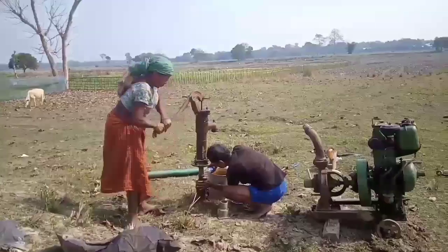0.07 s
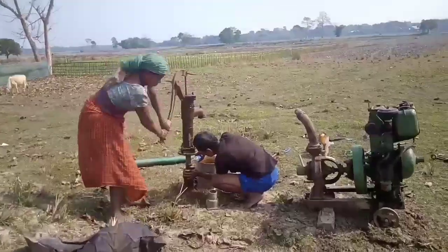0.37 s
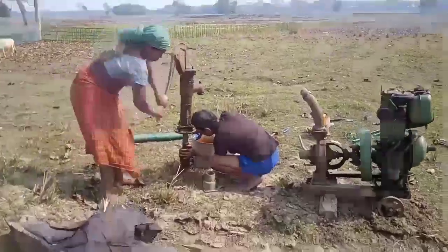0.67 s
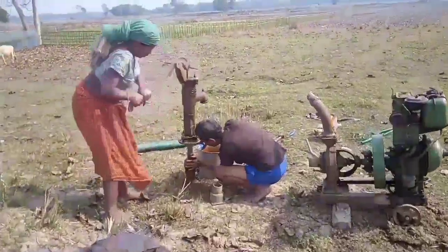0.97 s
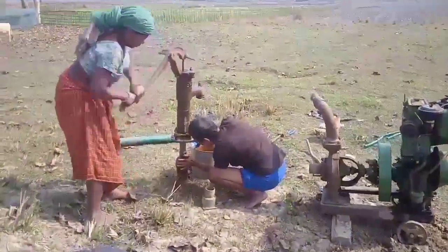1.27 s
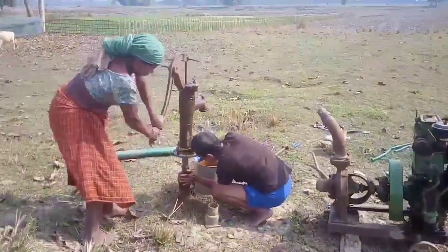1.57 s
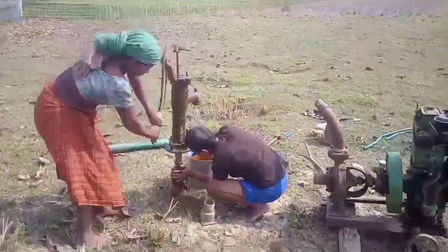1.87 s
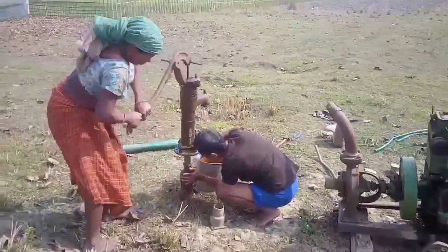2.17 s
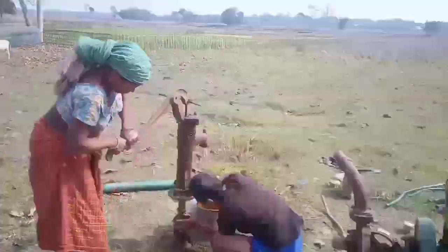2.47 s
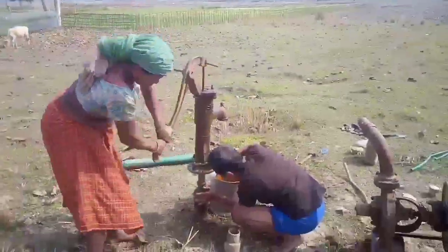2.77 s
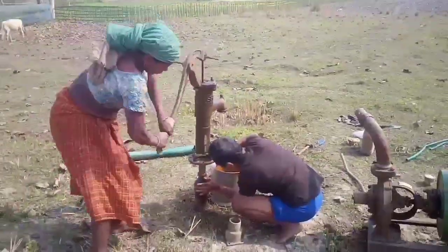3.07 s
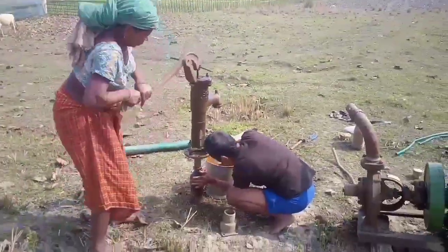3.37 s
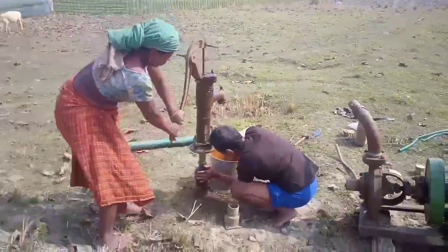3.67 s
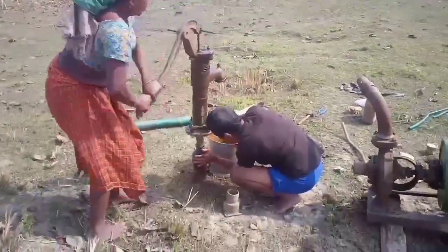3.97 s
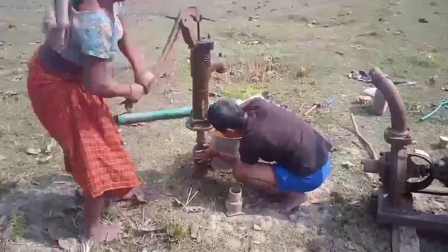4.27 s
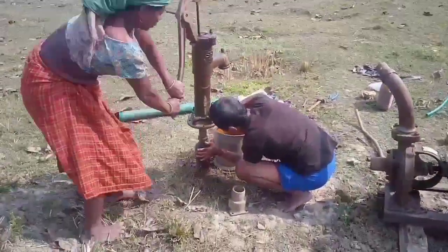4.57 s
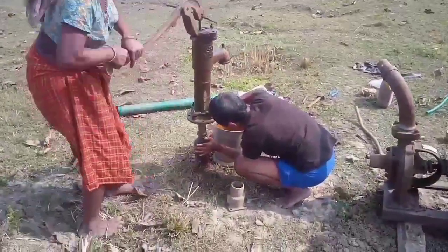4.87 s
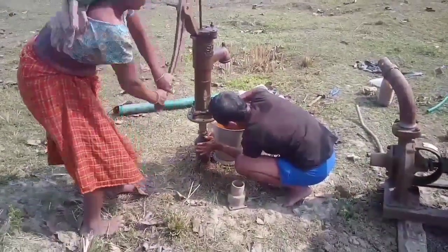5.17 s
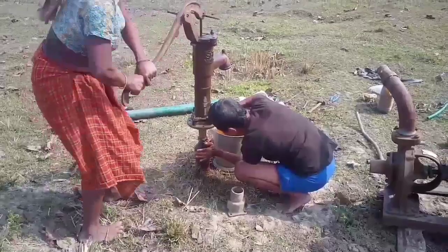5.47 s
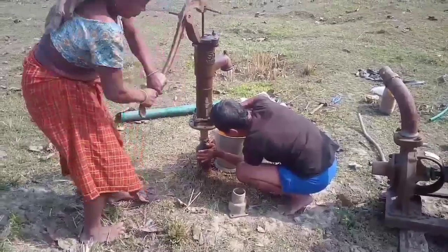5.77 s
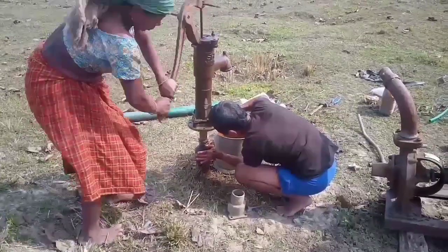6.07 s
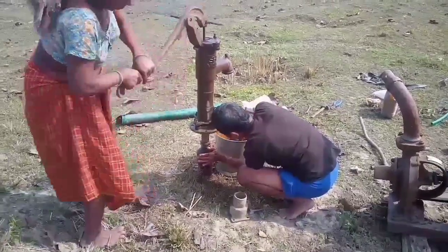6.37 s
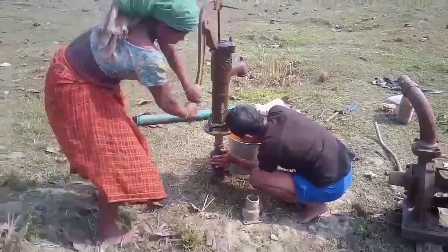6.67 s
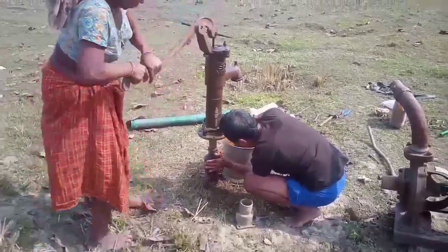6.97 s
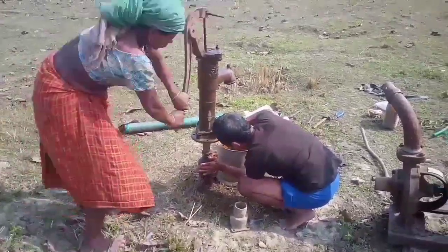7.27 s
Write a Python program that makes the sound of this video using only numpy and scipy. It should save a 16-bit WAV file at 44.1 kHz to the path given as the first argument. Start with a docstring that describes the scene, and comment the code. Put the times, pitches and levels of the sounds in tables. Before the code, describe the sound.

A cast-iron hand pump is worked in an open field for about seven and a half seconds, at roughly two strokes a second. Each stroke begins with a short raspy gulp from the valve, then the dry pivot scrapes and loose pins strike the iron. The piston stops with a clack, and the air in the barrel rings briefly with a hollow gliding note. Faint squeaks come between 1.5 and 2.7 seconds and again near 4.5. From about 3 seconds the clacks are louder, and the strokes gradually slow a little. Wind buffets the microphone throughout with an uneven low rumble, over a thin, patchy high hiss. Soft wind thumps land around 3 and 3.9 seconds. Stronger gusts arrive near 6 seconds, followed by a run of thumps from 6.3, hardest just after 7 seconds, around the last stroke.

```python
"""Wind buffets the microphone in an open field, over a thin high hiss.
A cast-iron hand pump is worked at about two strokes a second. In each stroke the valve gulps, the dry
pivot scrapes and loose pins clack; the piston then stops with a clack and the air in the barrel rings
with a gliding note. A few faint squeaks are heard. Towards the end the strokes slow a little and
eddies thump the microphone harder."""
import sys
import numpy as np
from scipy import signal
from scipy.fft import rfft, irfft, next_fast_len
from scipy.io import wavfile
from scipy.ndimage import uniform_filter1d, map_coordinates

SR = 44100
rng = np.random.default_rng(int(sys.argv[2]) if len(sys.argv) > 2 else 0)


def bounce(signal):
    """Save signal as a 16-bit WAV file at the path given by the first command-line argument."""
    frames = np.transpose(np.atleast_2d(signal))
    limited = np.clip(frames, -1, 1)
    pcm = np.round(limited * 32767).astype(np.int16)
    wavfile.write(sys.argv[1], SR, pcm)


N = 327222
TOP_HZ = 15750


def amp(db):
    """Decibels to gain."""
    return 10 ** (np.asarray(db) / 20)


def unit(x):
    """Scale to rms 1."""
    return x / np.sqrt(np.mean(x ** 2) + 1e-20)


def along(points, hz):
    """Interpolate (freq_hz, value) points on a log axis."""
    freqs_hz, values = np.transpose(points)
    return np.interp(np.log(hz + 1), np.log(freqs_hz + 1), values)


def curves(rows):
    """Per-sample curve for each column after time_s."""
    time_s, *columns = np.transpose(rows)
    return [np.interp(np.arange(N) / SR, time_s, column) for column in columns]


def wobble(rate_hz, size):
    """Smooth random curve, rate_hz knots a second."""
    knots = rng.standard_normal(int(size * rate_hz / SR) + 4)
    return map_coordinates(knots, [np.arange(size) * rate_hz / SR])


def filtered(x, response):
    """Apply a complex frequency response."""
    size = next_fast_len(len(x) + 4096)
    return irfft(rfft(x, size) * response(np.fft.rfftfreq(size, 1 / SR)), size)[:len(x)]


def noise(spectrum, size):
    """Coloured noise, rms 1."""
    return unit(filtered(rng.standard_normal(size), lambda hz: amp(along(spectrum, hz))))


def add(track, start_s, sound):
    """Mix a sound into the track."""
    part = track[max(round(start_s * SR), 0):][:len(sound)]
    part += sound[:len(part)]


def ring(t, attack_s, t60_s):
    """Soft rise, exponential fall, peak 1."""
    shape = (1 - np.exp(-t / attack_s)) * amp(-60 * t / t60_s)
    return shape / shape.max()


def rasp(t, hz, rise_oct_per_s, rough):
    """Gliding tone, shaken in strength and phase by turbulence."""
    phase = 2 * np.pi * np.cumsum(hz * 2 ** (rise_oct_per_s * t)) / SR
    shake = wobble(195, len(t)) + 1j * wobble(196.3, len(t))
    return np.imag((1 + rough * shake) * np.exp(1j * phase)) / np.sqrt(1 + 2 * rough ** 2)


def resonate(force, modes):
    """Drive (pitch_hz, width_hz, gain_db) modes of alternating sign."""
    hz, width_hz, db = np.transpose(modes).astype(np.float32)[:, :, None]
    gain = amp(db) * (-1) ** np.arange(len(hz))[:, None]

    def response(f):
        f = np.maximum(f, 1).astype(np.float32)
        detune = (hz * hz / f - f) / width_hz
        in_phase = 1 / (1 + detune * detune)
        return (gain.T @ in_phase + 1j * (gain.T @ (in_phase * detune)))[0]
    return filtered(force, response)


def excite(force, modes, damping, scatter_db):
    """Drive modes at random strengths, widths times damping; rms 1."""
    varied = [(hz, width * damping, db + scatter_db * rng.standard_normal()) for hz, width, db in modes]
    return unit(resonate(force, varied))


def patchy(x, depth_db):
    """Slow random patches of gain over pitch and time; rms 1."""
    spectra = signal.stft(x, nperseg=512)[2]
    patches = uniform_filter1d(rng.standard_normal(spectra.shape), size=8, axis=0)
    patches = uniform_filter1d(patches, size=50, axis=1)
    return unit(signal.istft(spectra * amp(depth_db * unit(patches)), nperseg=512)[1][:N])


# Spectra of field hush, hiss and high fizz: freq_hz, density_db
FIELD_SPECTRUM = [(300, 2), (800, -1.5), (1250, 5.5), (2400, 2), (3100, 3), (4500, -10.5), (12000, -23)]
HISS_SPECTRUM = [(2500, -16), (4200, -4.5), (5200, 5.5), (6200, 5.5), (7300, 2), (8500, 1), (9800, -10),
                 (14000, -66)]
FIZZ_SPECTRUM = [(5590, -37), (9500, -11), (11000, -5.5), (13300, 3.5), (13900, 1.5), (15300, -3.5),
                 (16000, -18)]
# Hiss levels: time_s, hiss_db, fizz_db
HISS_LEVELS = [(0, -51.5, -56), (.28, -59, -61), (.38, -53, -46.5), (.7, -55.5, -58.5), (1.26, -57.5, -62),
               (1.56, -51.5, -60.5), (3.6, -57, -57), (4.25, -61, -61), (4.55, -45.5, -50),
               (4.78, -58, -56), (5.1, -50, -58.5), (5.8, -55.5, -59.5), (6.15, -52, -52.5),
               (7.2, -60, -59), (7.29, -48.5, -46), (7.33, -66, -71), (7.42, -50.5, -58)]


def hiss():
    """Steady field hush under two bands of patchy high hiss that swell and drop out."""
    hiss_db, fizz_db = curves(HISS_LEVELS)
    high_hiss = amp(hiss_db) * patchy(noise(HISS_SPECTRUM, N), depth_db=2.1)
    high_hiss += amp(fizz_db) * patchy(noise(FIZZ_SPECTRUM, N), depth_db=2.1)
    hush = amp(-64) * noise(FIELD_SPECTRUM, N)
    return hush + amp(1.25 * wobble(16, N)) * high_hiss


# Buffet spectrum: freq_hz, density_db
BUFFET_SPECTRUM = [(30, -50), (50, -47), (80, -11), (130, 0.5), (200, 4), (330, -3.5), (480, -11.5),
                   (800, -28.5), (1300, -41), (2500, -64), (5000, -88)]
# Gusts: time_s, level_db
GUSTS = [(0.0, -37.5), (0.76, -42.5), (0.88, -52), (1.16, -42), (1.26, -48), (1.44, -40.5), (2.44, -48),
         (2.88, -40.5), (3.04, -45.5), (3.62, -33.5), (3.7, -38), (4.54, -41), (5.26, -56.5), (5.32, -52),
         (5.72, -48.5), (5.92, -34.5), (6.14, -46), (6.34, -31), (6.44, -37.5), (6.88, -50), (7.02, -39),
         (7.42, -46)]


def wind():
    """Lumpy turbulence at the microphone port; stronger gusts reach higher in pitch."""
    gust_db, = curves(GUSTS)
    lumps_db = 3 * wobble(70, N) + 1.6 * wobble(16, N)
    rumble = noise(BUFFET_SPECTRUM, N)
    low = filtered(rumble, lambda hz: 1 / (1 + (hz / 330) ** 4))
    reach = amp(2.15 * np.clip(gust_db + lumps_db + 41.5, -20, 6))
    puffs = amp(lumps_db) * (low + reach * (rumble - low))
    local_rms = np.sqrt(np.abs(uniform_filter1d(puffs ** 2, size=7000)) + 1e-9)
    return amp(gust_db + 0.6) * puffs / local_rms


# Eddies hitting the port: time_s, level_db
EDDIES = [(1.156, -35.5), (2.963, -19.5), (3.491, -26), (3.874, -20), (4.537, -27), (6.333, -20.5),
          (6.526, -16.5), (6.635, -20.5), (6.735, -29.5), (6.979, -21), (7.067, -19), (7.081, -13),
          (7.181, -10), (7.276, -18)]


def eddy_slaps():
    """An eddy builds to one suction pulse, which the port rounds into a thump."""
    lead_s, t60_s = .011, .11
    spectrum = [(30, -57), (75, -7), (160, 2.5), (450, 6.5), (1000, -13.5), (2500, -34), (5000, -90)]
    out, t = np.zeros(N), np.arange(SR // 10) / SR - 2 * lead_s
    swell = np.where(t < 0, np.exp(-(t / lead_s) ** 2), amp(-60 * t / t60_s))
    for time_s, db in EDDIES:
        width_s = 0.00035 * np.exp(0.08 * rng.standard_normal())
        suction = -np.exp(-np.abs(t - .0025) / width_s)
        port = signal.butter(3, [150, 1100 * amp(.5 * (db + 18))], "band", fs=SR, output="sos")
        thump = signal.sosfilt(port, suction)
        eddy = amp(-10.5) * noise(spectrum, len(t)) * swell
        add(out, time_s + t[0], amp(db - 2.5) * (thump / np.abs(thump).max() + eddy))
    return out


# Short gliding tones: start_s, length_s, pitch_hz, rise_oct_per_s, level_db
GLIDES = [(1.459, 0.058, 1196, 2.5, -42.5), (1.536, 0.014, 7030, 1.3, -37), (1.851, 0.067, 1170, 3, -41.5),
          (1.899, 0.072, 1860, 1, -42.5), (2.262, 0.072, 1290, 2.92, -46.5), (2.656, .07, 1194, 2.5, -53),
          (4.536, 0.047, 4330, -1.5, -47), (4.546, 0.063, 2570, -0.5, -55)]


def gliding_tones():
    """The barrel's air note rising after a stroke, and a few faint higher squeaks."""
    out = np.zeros(N)
    for start_s, length_s, hz, rise, db in GLIDES:
        t = np.arange(int(length_s * SR)) / SR
        add(out, start_s, amp(db) * rasp(t, hz, rise, rough=0.9) * np.sin(np.pi * t / length_s))
    return out


# Hollow body modes: pitch_hz, width_hz, gain_db
HOLLOW_MODES = [(445, 69, 33.5), (740, 340, 14.5), (848, 91, -11), (1103, 190, 0), (1500, 880, -7.5),
                (2055, 300, -5), (2372, 250, -6), (3075, 300, -3.5), (3850, 160, -5.5)]


def hollow(force, damping, scatter_db):
    """The hollow body rings in its upper modes."""
    return excite(force, HOLLOW_MODES[2:], damping, scatter_db)


# Casting and lever modes: pitch_hz, width_hz, gain_db
IRON_MODES = [(1500, 54, -15), (1990, 62, -14), (2350, 77, -13), (3030, 52, -9), (3830, 120, -12),
              (4720, 61, -16), (5240, 75, -12), (5890, 46, -13), (6320, 63, -4), (6870, 81, 0),
              (7970, 84, -8), (8530, 67, -10), (9120, 40, -11), (9530, 71, -11), (9820, 51, -11),
              (10800, 58, -8), (11600, 77, -19), (12200, 70, -8), (12800, 67, -6), (13700, 110, -13),
              (14300, 60, -11), (14900, 61, -6)]


def iron(force, damping, scatter_db):
    """The casting rings, its modes weighted anew by each contact."""
    return excite(force, IRON_MODES, damping, scatter_db)


# Bare contact noise: freq_hz, density_db
CONTACT_SPECTRUM = [(80, -27), (300, 26.5), (800, -3.5), (1500, -12.5), (4000, -1.5), (7000, 10.5),
                    (10000, -2.5), (14000, -4.5), (16000, -26)]


def linkage(force, width_hz, count):
    """Short-lived resonances of the loose joints, shifting with every contact."""
    pitches_hz = np.sort(rng.uniform(588, TOP_HZ, count))
    modes = [(hz, width_hz, along(CONTACT_SPECTRUM, hz)) for hz in pitches_hz]
    return excite(force, modes, damping=1, scatter_db=0.5)


# Lever strokes: start_s, stop_s, rub_db, gulp_db, clack_db, clack_body, low_mode_db, upper_mode_db
STROKES = [(0.182, 0.243, -47, -37, -28.5, -15, -58, -42), (0.513, 0.668, -50.5, -69, -25, -7, -62, -45.5),
           (0.912, 1.045, -51.5, -43, -25.5, -2, -48, -29.5),
           (1.301, 1.443, -48, -41, -21, -12.5, -37.5, -50),
           (1.69, 1.834, -53.5, -37.5, -23.5, -8, -32, -44),
           (2.076, 2.235, -47.5, -40.5, -27, 6, -42.5, -41), (2.472, 2.625, -52, -27, -29.5, -7, -34, -44),
           (2.878, 3.051, -49, -29, -17, -0.5, -33.5, -32.5),
           (3.34, 3.51, -50.5, -29.5, -13.5, 1, -40, -30),
           (3.823, 3.999, -47, -35.5, -18.5, -7, -40.5, -44),
           (4.323, 4.489, -45.5, -37, -14.5, -5.5, -24, -35.5),
           (4.814, 5.001, -56, -32.5, -13, -3.5, -29.5, -48), (5.3, 5.511, -46, -33, -16.5, 1.5, -27, -44),
           (5.851, 6.009, -42, -31.5, -18.5, -6, -34, -35),
           (6.36, 6.546, -46, -29.5, -18.5, -4, -29.5, -41), (6.93, 7.136, -43, -26.5, -19.5, -8, -26, -31)]


def valve():
    """Water passes the valve as each stroke starts: a raspy rising gulp and a scratchy knock."""
    out, t = np.zeros(N), np.arange(SR // 6) / SR
    for start_s, _, _, gulp_db, *_ in STROKES:
        tuning = 1 + 0.0274 * rng.standard_normal()
        envelope = ring(t, 0.0093, 0.053) + 0.14 * ring(t, 0.0031, 0.2)
        note = rasp(t, 586.3 * tuning, 4.9, rough=1.0) * envelope
        undertone = amp(-4.5) * rasp(t, 400 * tuning, 2.3, rough=0.2) * ring(t, 0.0037, 0.045)
        overtone = amp(-51.5) * rasp(t, 1620 * tuning, -0.88, rough=1.9) * ring(t, 0.0078, 0.047)
        scratch = hollow(rng.standard_normal(len(t)), damping=2.2, scatter_db=4)
        knock = amp(-53.5) * scratch * ring(t, 0.0013, 0.09)
        spit = amp(-40) * noise(CONTACT_SPECTRUM, len(t)) * ring(t, 0.0019, 0.0099)
        add(out, start_s, amp(gulp_db - 4) * (note + undertone) + overtone + knock + spit)
    return out


LOW_MODE_HZ, UPPER_MODE_HZ = 454, 1107  # air in the barrel


def air_sweep():
    """The piston shortens the air column: a breathy note climbs, less so as the pump primes."""
    primed_s = 3.7
    out = np.zeros(N)
    for start_s, stop_s, *_ in STROKES:
        length_s = stop_s - start_s
        t = np.arange(int(length_s * SR)) / SR
        rise_oct_per_s = 6.1 * max(1 - start_s / primed_s, 0)
        note = rasp(t, UPPER_MODE_HZ * 2 ** (-rise_oct_per_s * length_s), rise_oct_per_s, rough=2.2)
        add(out, start_s, amp(-54.5) * note * np.sin(np.pi * t / length_s))
    return out


def barrel():
    """The piston stops with a hollow knock; the air rings on, its modes drifting as the water moves."""
    delay_s = .005
    knock_modes = [(hz, width * 2.5, db) for hz, width, db in HOLLOW_MODES[1:]]
    out, t = np.zeros(N), np.arange(SR // 4) / SR
    for _, stop_s, *_, low_db, upper_db in STROKES:
        upper_hz = UPPER_MODE_HZ * (1 + 0.026 * rng.standard_normal())
        low = amp(low_db - 1) * rasp(t, LOW_MODE_HZ, -0.59, rough=0.13)
        low *= ring(t, 0.0041, 0.059) + 0.33 * ring(t, 0.019, 0.13)
        upper = amp(upper_db - 1.5) * rasp(t, upper_hz, 2.72, rough=0.66)
        upper *= ring(t, 0.0018, 0.097) + 0.14 * ring(t, 0.011, 0.069)
        knock = resonate(ring(t, 0.003, 0.046) * rng.standard_normal(len(t)), knock_modes)
        knock *= amp(max(upper_db - 6, low_db - 19)) / np.abs(knock).max()
        add(out, stop_s + delay_s, low + upper + knock)
    return out


def ticks(t, count=10, rate_hz=20, t60_s=.014):
    """Force envelope of small slips, uneven in time and strength."""
    times_s = np.cumsum(rng.uniform(0, 2, count)) / rate_hz
    age_s = t - times_s[:, None]
    decays = amp(-60 * np.abs(age_s) / t60_s) * (age_s > 0)
    return amp(16 + 3 * rng.standard_normal(count)) @ decays


def rubbing(pressure, t):
    """One dry contact sticks, slips and ticks; returns the iron's ring and the hollow body's."""
    grain = (amp(3.9 * wobble(81.3, len(t))) + ticks(t)) * amp(4.6 * wobble(700, len(t)))
    slips = pressure * grain * rng.standard_normal(len(t))
    joints = linkage(slips, width_hz=210, count=24)
    metal = iron(slips, damping=.6, scatter_db=5) + amp(-3) * joints
    body = unit(resonate(slips, HOLLOW_MODES)) + amp(-6) * hollow(slips, damping=.35, scatter_db=4)
    return np.array([metal, body])


def pivot_scrape():
    """Two dry contacts rub, easing as the lever slows, then softly on the swing back."""
    delay_s, overrun_s = .024, .004
    attack_s, release_s, return_t60_s, ease_db = .0098, .035, .18, 7
    out = np.zeros(N)
    for start_s, stop_s, db, *_ in STROKES:
        length_s = stop_s + overrun_s - start_s - delay_s
        t = np.arange(int((length_s + return_t60_s / 2) * SR)) / SR
        push = np.clip(np.minimum(t / attack_s, (length_s - t) / release_s), 0, 1)
        push *= amp(-ease_db * t / length_s)
        swing_back = amp(-11) * ring(np.maximum(t - length_s, 0), 0.0088, return_t60_s)
        metal, body = sum(rubbing(push + swing_back, t) for _ in range(2))
        scrape = amp(db + 1) * unit(metal) + amp(-50.5 + .5 * (db + 48)) * unit(body)
        add(out, start_s + delay_s, scrape * np.sqrt(length_s / t[-1]))
    return out


def clack(contact, body, top):
    """Contact chatter rings joints, casting and hollow body; body lifts the mids, top the treble."""
    chatter = contact * amp(2.6 * wobble(597, len(contact))) * rng.standard_normal(len(contact))
    grip = np.clip(2.5 + (body + 18) / 22, .25, 1)  # a glancing blow lets the lever ring on
    joints = amp(-0.5) * grip * linkage(chatter, width_hz=195, count=50)
    casting = iron(chatter, damping=0.75 * grip, scatter_db=4)
    cavity = amp(-8.5) * hollow(chatter, damping=0.61, scatter_db=2.5)
    body_db, top_db = 0.61 * (body + 5), 0.78 * (top + 14.5)
    colour = [(1000, body_db + 0.71), (2800, body_db - 1.5), (6500, 0), (12500, top_db)]
    blow = filtered(joints + casting + cavity, lambda hz: amp(along(colour, hz)))
    peak_rms = np.sqrt(uniform_filter1d(blow ** 2, size=128).max())
    return blow / peak_rms


# Loose pins striking the iron: time_s, level_db, body, top
PIN_STRIKES = [(0.2089, -21.5, -8, -8), (0.4615, -32, -14, -10), (0.6083, -22, 6, 0.5),
               (0.9555, -25, -28, -23), (0.9875, -30.5, 8, -6), (1.3335, -23, -9, -20),
               (1.393, -19.5, 3.5, -9), (1.722, -28, 6, -9), (1.8562, -22.5, -6.5, -16),
               (2.1744, -28.5, 19, -7), (2.495, -22, -9, -25), (2.5356, -26, 6, -23), (2.5618, -26, 1, -7),
               (2.9084, -22, -20, -24), (2.989, -21.5, -10.5, -17), (3.4036, -28.5, 6, -25),
               (3.4267, -22, -10, -21), (3.9195, -19, -15, -17), (3.9352, -24, -20, -23),
               (4.337, -25.5, -17, -18), (4.3896, -24.5, -27, -10), (4.43, -14, -27, -17),
               (4.832, -29, -16, -16), (4.9126, -27.5, -9, -28), (5.348, -24.5, -32, -34),
               (5.391, -22.5, -13, -16), (5.43, -19.5, -44, -16), (5.445, -18.5, -63, -36),
               (5.4967, -15, -31, 5), (5.876, -22.5, -31, -20), (5.913, -17.5, -30, -8),
               (5.9288, -22.5, -18, -32), (5.9555, -15.5, -14, -9), (6.397, -28.5, -17, -16),
               (6.4516, -25, -12, -20), (6.4947, -17, -11, -16), (7.004, -23, -11, -19),
               (7.0543, -13, -34, -23)]


def clacks():
    """Pins slide briefly and strike the iron; every stroke also ends on a clack."""
    lead_s = .014
    out, t = np.zeros(N), np.arange(SR // 7) / SR - lead_s
    slide = amp(-16.5) * amp(1000 * np.minimum(t, 0)) * (t < 0)
    pin = slide + ring(np.maximum(t, 0), attack_s=.00035, t60_s=.04)
    stop = slide + ring(np.maximum(t, 0), attack_s=.001, t60_s=.046)
    for _, stop_s, _, _, db, body, *_ in STROKES:
        top = -3 + 1.4 * (db + 10)  # softer stops are duller
        add(out, stop_s - lead_s, amp(db - 8) * clack(stop, body, top))
    for time_s, db, body, top in PIN_STRIKES:
        add(out, time_s - lead_s, amp(db - 8) * clack(pin, body, top))
    return out


def scene():
    """The pump in open air, wind at the microphone; mono."""
    pump = clacks() + pivot_scrape() + air_sweep() + barrel() + valve() + gliding_tones()
    return (pump + wind() + eddy_slaps() + hiss())[None]


def record(dry):
    """Steep low-pass at TOP_HZ."""
    return np.array([filtered(channel, lambda hz: 1 / (1 + (hz / TOP_HZ) ** 120)) for channel in dry])


dry = scene()
out = record(dry)
bounce(out)
```